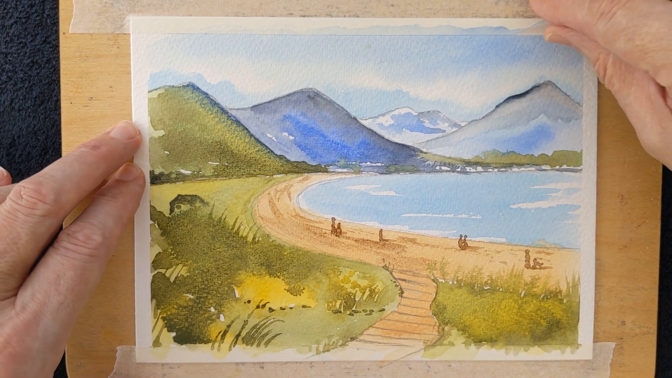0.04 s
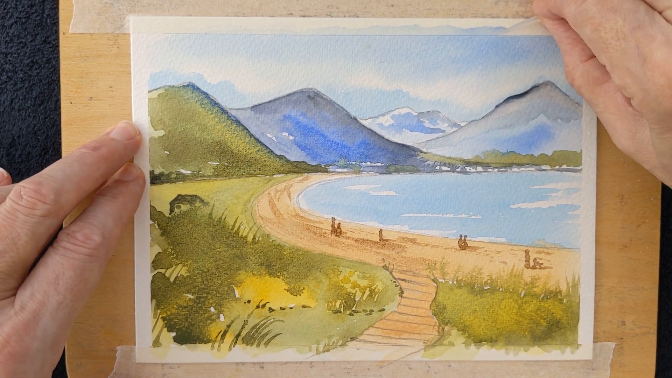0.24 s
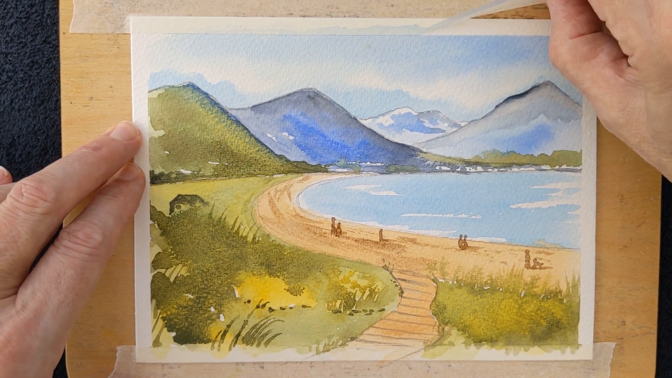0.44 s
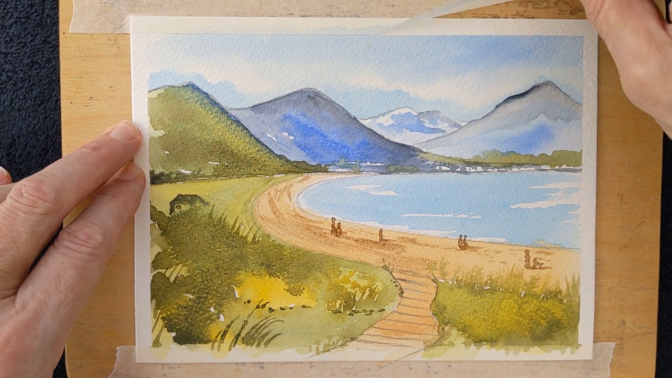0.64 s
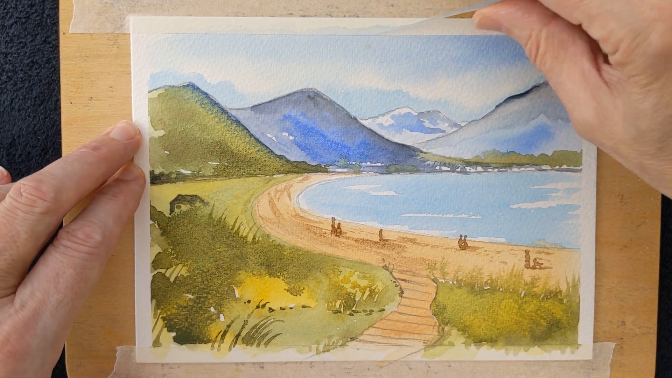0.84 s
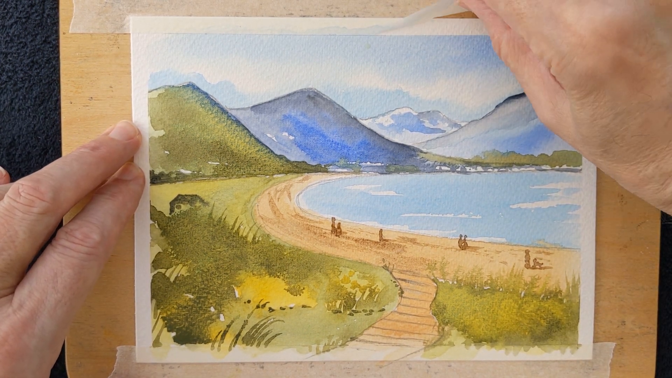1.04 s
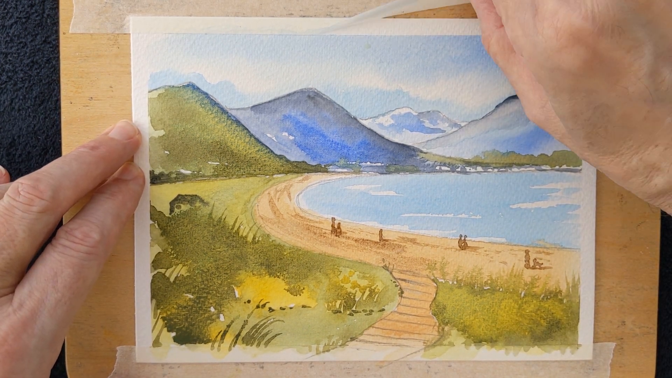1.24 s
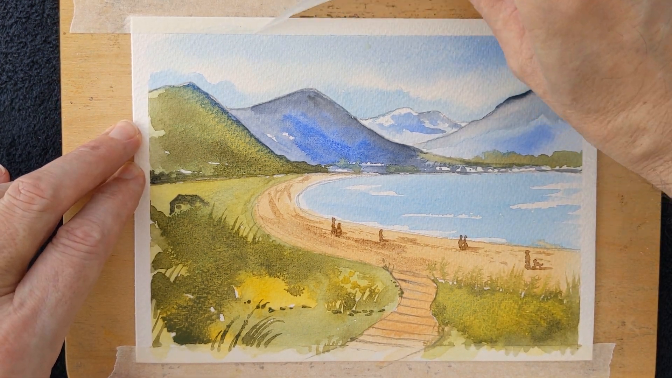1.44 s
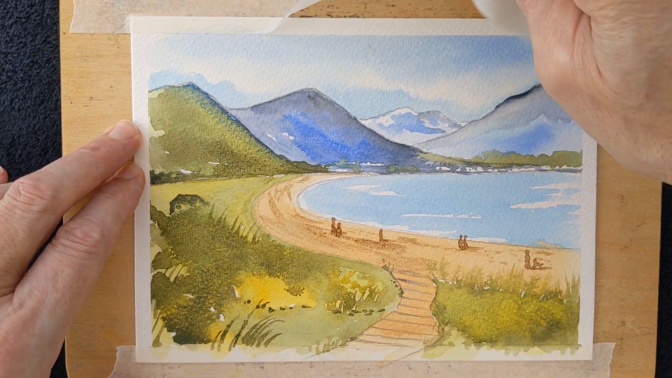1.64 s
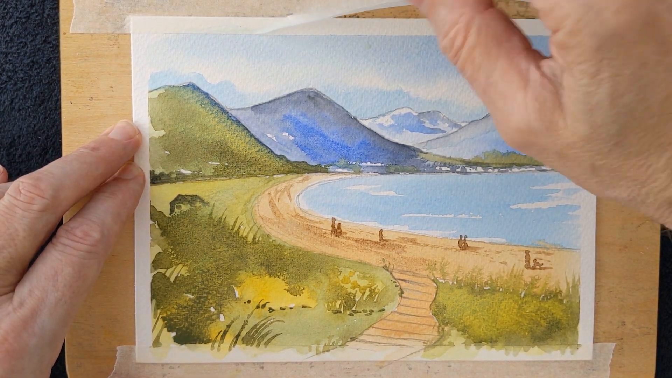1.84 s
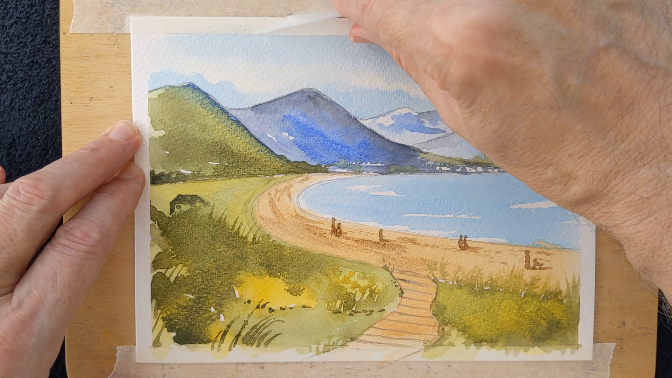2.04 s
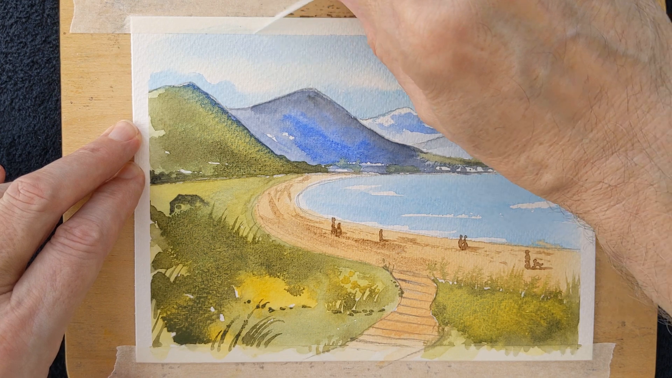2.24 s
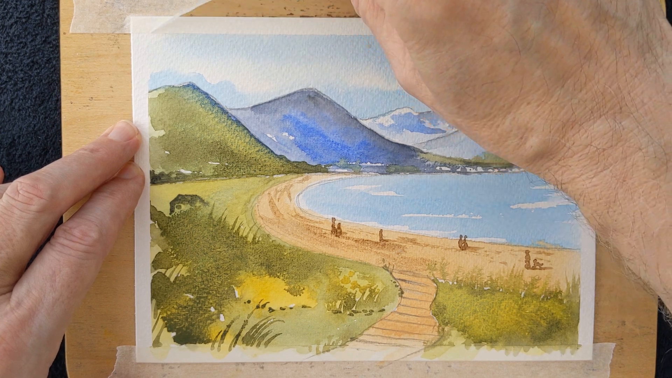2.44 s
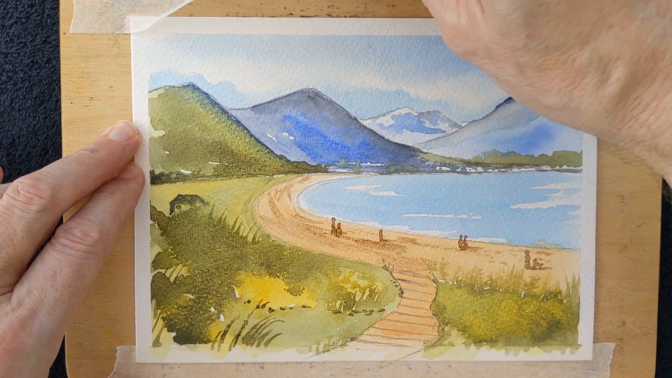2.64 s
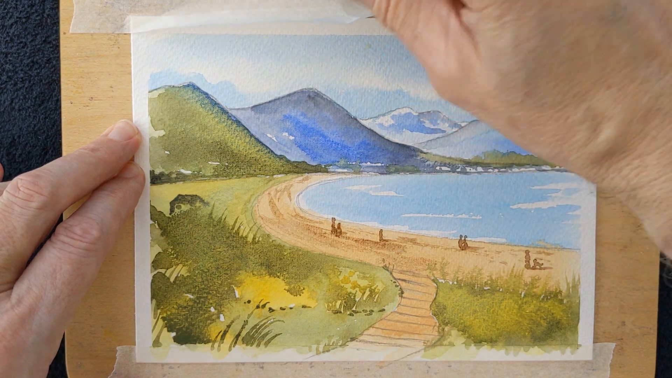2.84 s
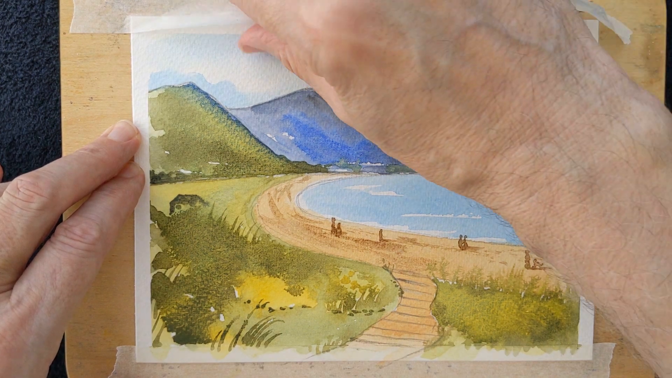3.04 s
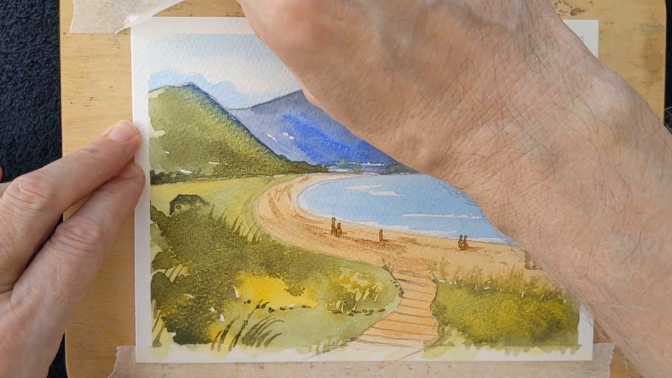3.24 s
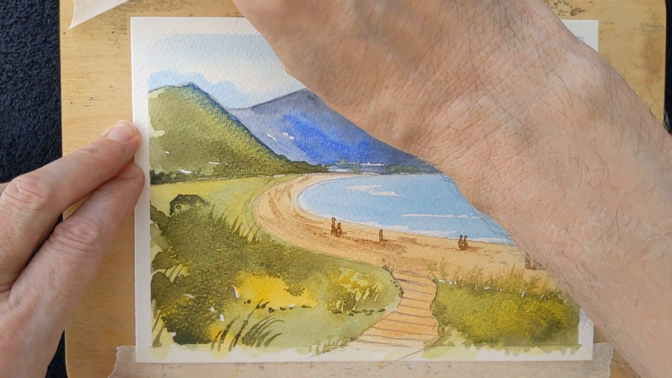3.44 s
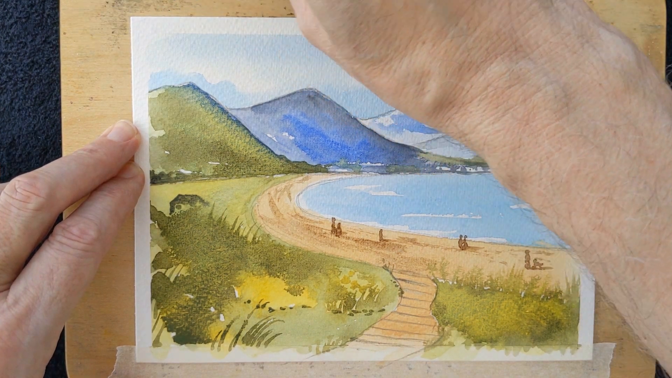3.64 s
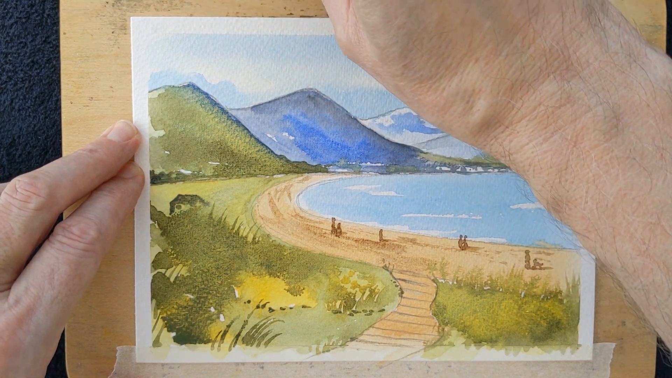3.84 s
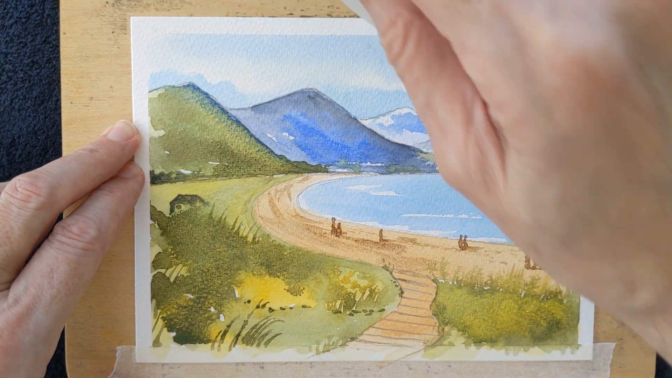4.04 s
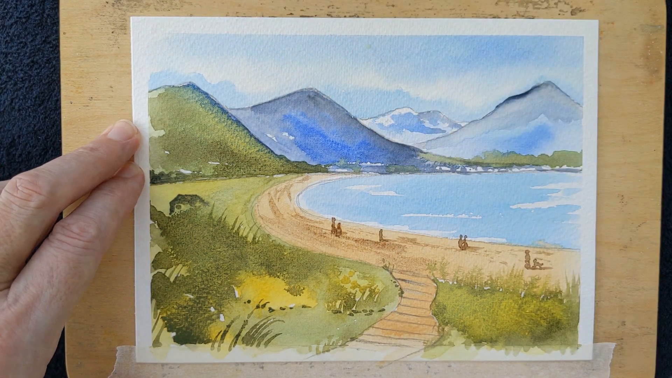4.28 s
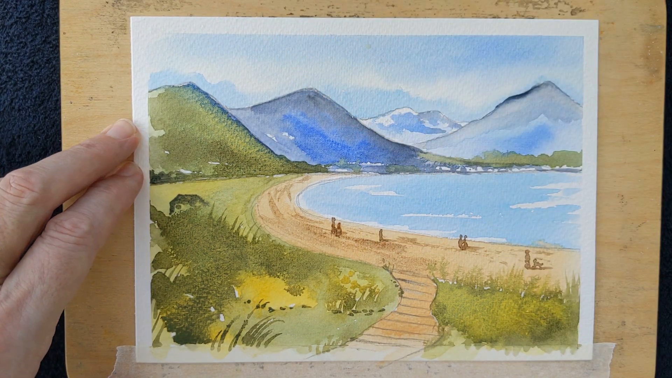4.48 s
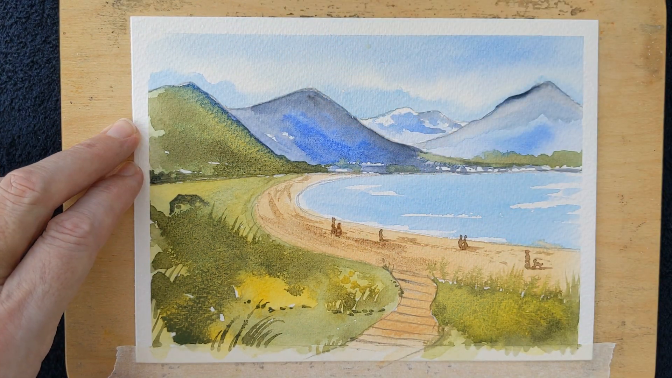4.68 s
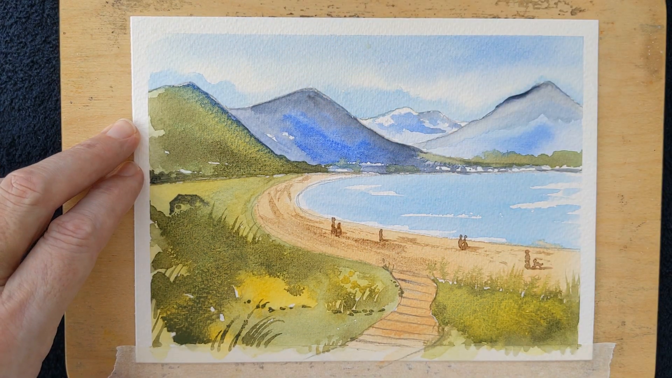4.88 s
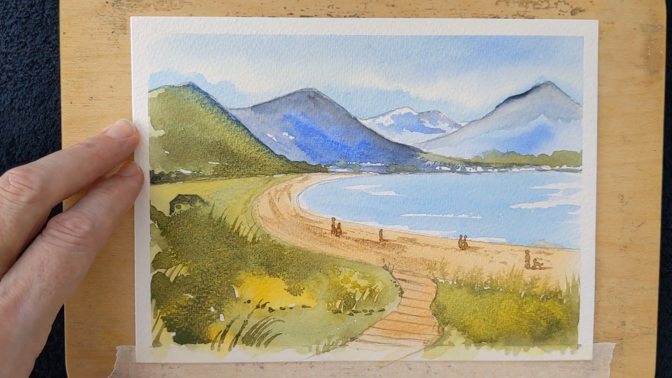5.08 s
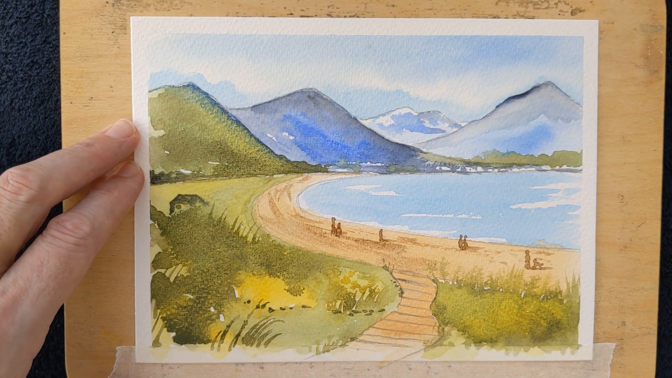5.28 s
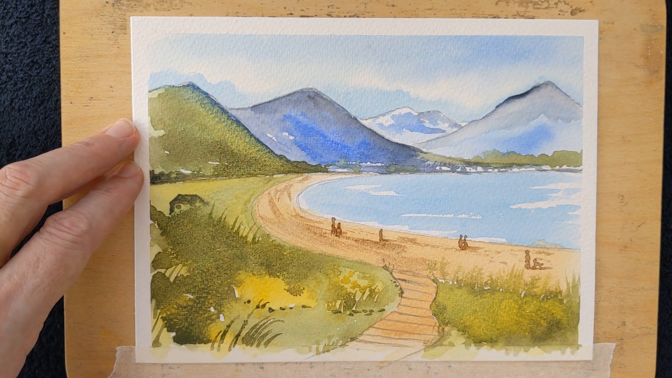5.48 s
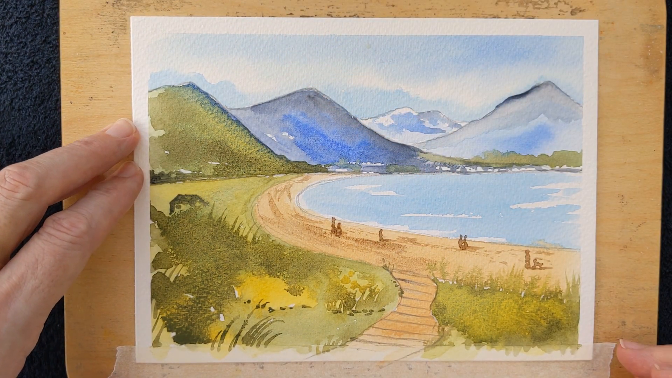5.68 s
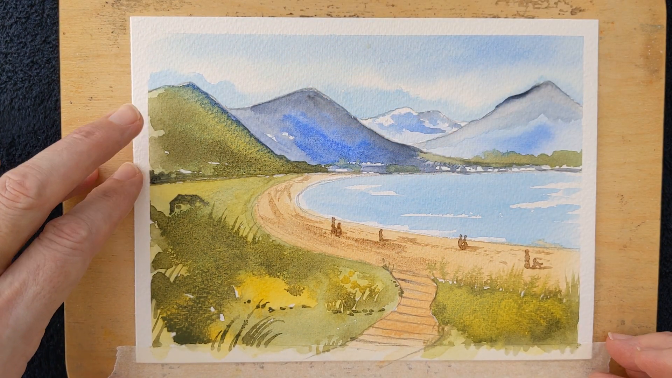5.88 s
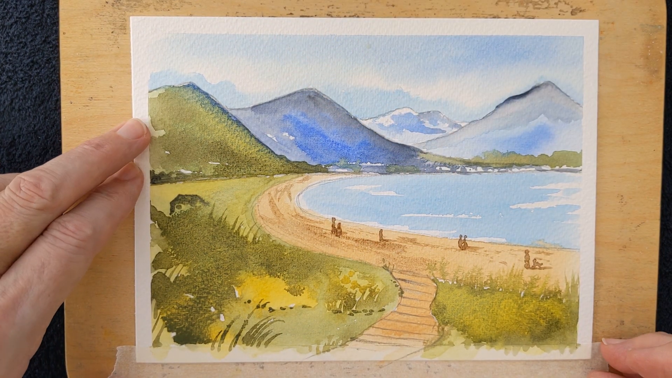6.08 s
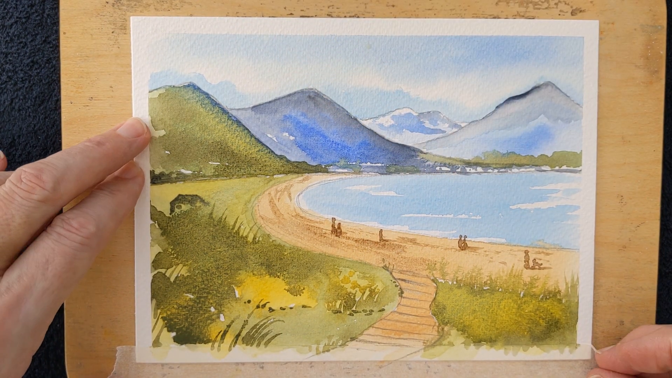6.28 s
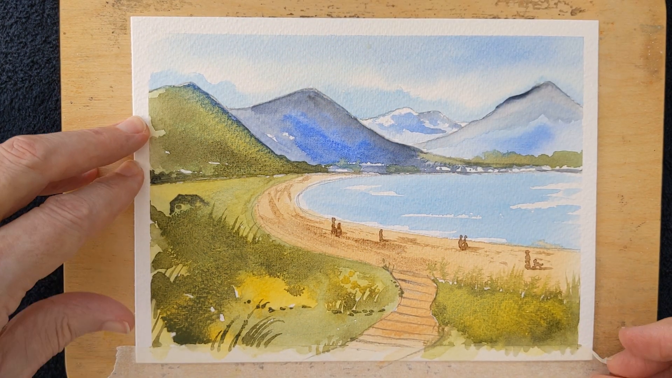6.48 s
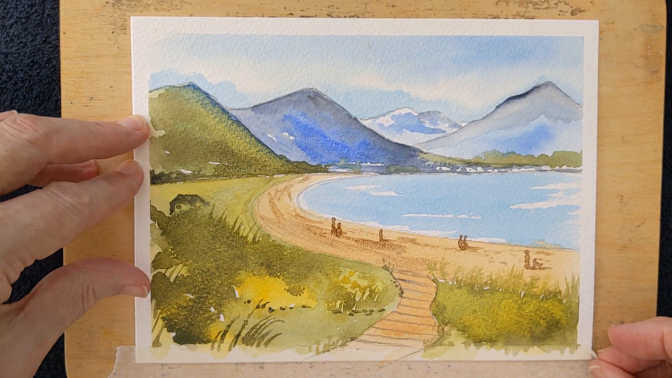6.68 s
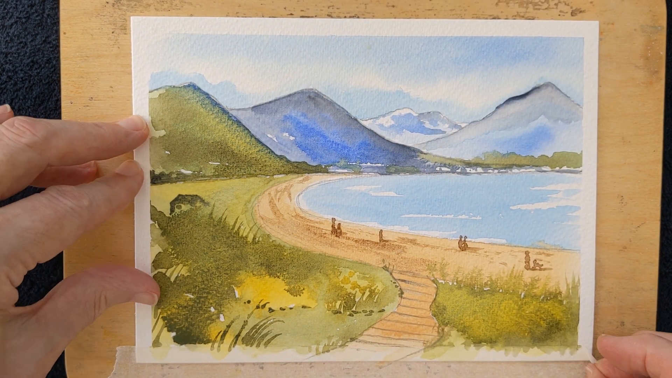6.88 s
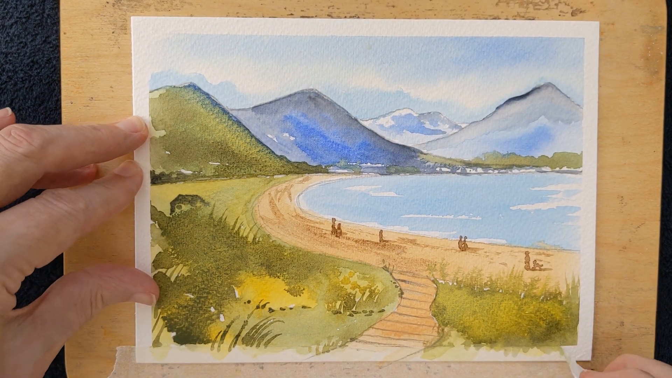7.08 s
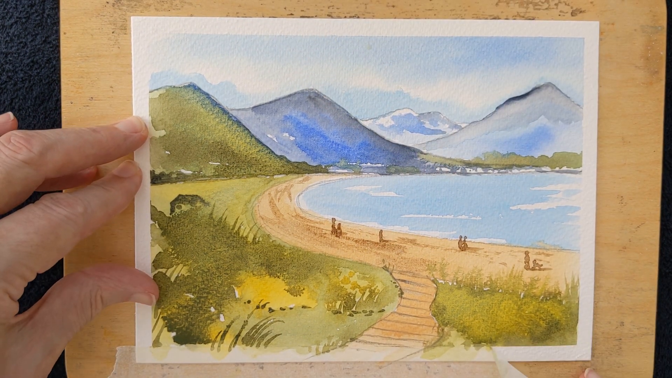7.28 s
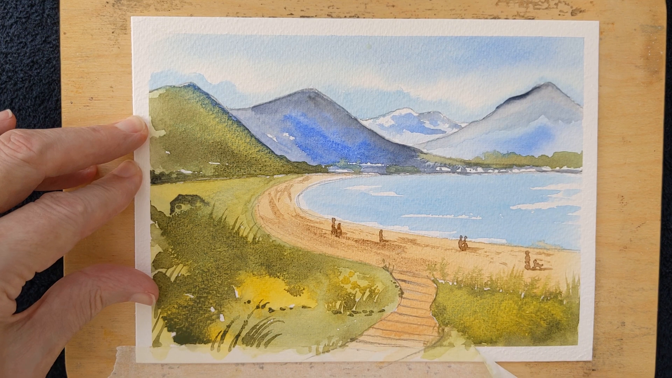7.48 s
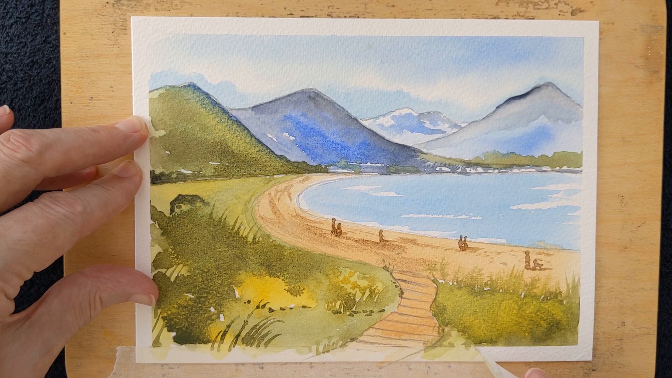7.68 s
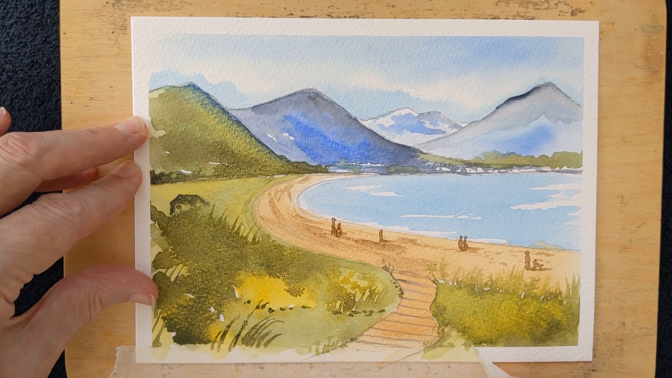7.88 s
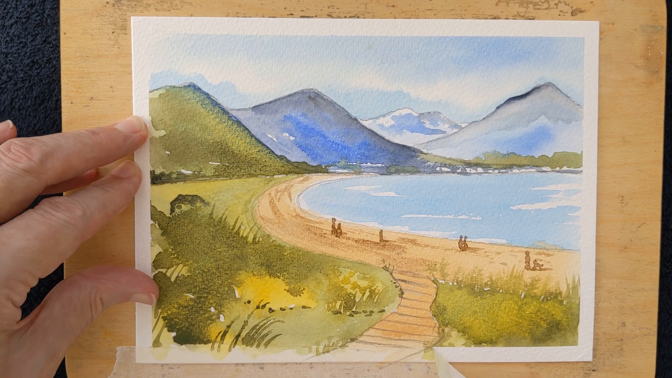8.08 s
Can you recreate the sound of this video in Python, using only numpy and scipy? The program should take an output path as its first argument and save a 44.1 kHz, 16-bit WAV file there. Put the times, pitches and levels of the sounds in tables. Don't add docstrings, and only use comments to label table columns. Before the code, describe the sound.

Indoors, close stereo microphone, with a quiet steady mains hum, soft ventilation and low rumble throughout. Masking tape is peeled from paper on a wooden board. A small creak of glue at 0.25 s leads into a bright crackling rip from 0.3 to 0.55 s, packed with sharp snaps, then a single snap near 0.7. A second strong rip runs from 1.25 to 1.45 s, with a short tick at 1.6. A longer rasp comes at 2.3 to 2.5 s, faint creeping crackle follows, and two quick rips sound at 3.45 and 3.6. The strip drops softly at 4.3 s. Quiet rubs and a tick come around 5.1, then fingertips pick and knock woodily from 5.9 to 6.6, loudest at 6.2. A duller rip follows at 7.1 to 7.35 s, and a last short rip at 8.0 to 8.1. Each rip leaves a brief hard-room ring.

```python
import sys
import numpy as np
from scipy import signal
from scipy.fft import rfft, irfft, next_fast_len
from scipy.io import wavfile
from scipy.ndimage import uniform_filter1d

SR = 44100
rng = np.random.default_rng(int(sys.argv[2]) if len(sys.argv) > 2 else 0)


def output_pcm(signal):
    pcm = np.clip(np.atleast_2d(signal).T, -1, 1) * 32767
    wavfile.write(sys.argv[1], SR, np.round(pcm).astype(np.int16))


def ratio_of_db(decibels):
    return 10 ** (np.asarray(decibels, float) / 20)


N = 358091


def evened(x):
    return x / np.sqrt(np.mean(x ** 2) + 1e-20)


def read(points, hz):
    f, value = np.transpose(points)
    return np.interp(np.log(hz + 1), np.log(f + 1), value)


def add(mix, s, sound):
    part = mix[..., round(s * SR):][..., :sound.shape[-1]]
    part += sound[..., :part.shape[-1]]


def ports(pair, alike):
    size = next_fast_len(pair.shape[1])
    left, other = rfft(pair, size)
    same = np.clip(read(alike, np.fft.rfftfreq(size, 1 / SR)), -.99, .99)
    right = same * left + np.sqrt(1 - same ** 2) * other
    return irfft([left, right], size)[:, :pair.shape[1]]


# (frequency [Hz], density [dB per Hz])
AIR_SPECTRUM = [(120, -47), (200, -15), (245, -12.5), (299, -4), (380, -12.5), (696, -9.5), (1020, -16.5),
                (1680, -18), (1840, -19.5), (4680, -25), (7410, -33), (11900, -27.5), (16000, -34)]
# (frequency [Hz], likeness [-1..1])
AIR_ALIKE = [(130, 0.65), (300, -0.55), (600, -0.22), (3000, 0.)]


def air(level_db=-67.5, patch_db=1.1):
    frames, hz = N // 256 + 5, np.fft.rfftfreq(1024, 1 / SR)
    real, imag, patches = rng.standard_normal((2, frames, 513, 3)).T
    patches = uniform_filter1d(patches, size=12, axis=0)
    patches = evened(uniform_filter1d(patches, size=14, axis=1))
    z = (real + 1j * imag) * ratio_of_db(read(AIR_SPECTRUM, hz)[:, None, None] + patch_db * patches)
    noise = signal.istft(np.moveaxis(z, 2, 0), nperseg=1024, noverlap=768)[1][:, :N]
    return ratio_of_db(level_db) * ports(evened(noise), AIR_ALIKE)


# (frequency [Hz], level [dB])
HUM_LINES = [(301.5, -73), (597.5, -85), (699.8, -84), (748.3, -85.5), (1701, -93.5)]


def hum(gain_db=3.5, waver_db=0.4):
    t = np.arange(N) / SR
    drifts = evened(uniform_filter1d(rng.standard_normal((len(HUM_LINES), N // 441 + 2)), size=12))
    mono = np.zeros(N)
    for (hz, db), drift in zip(HUM_LINES, drifts):
        waver = waver_db * np.interp(t, np.arange(len(drift)) / 100, drift)
        mono += ratio_of_db(db + gain_db + waver) * np.sin(2 * np.pi * hz * t)
    return mono * ratio_of_db(np.array([[-1.5], [1.5]]))


# (time [s], spread [s], rumble rise [dB], thud rise [dB])
PRESSES = [
    (0, .1, 3, 5),
    (.5, 0.24, 10, 14.5),
    (1.35, 0.18, 3, 10),
    (2.4, 0.17, 4, 4),
    (3.55, 0.14, 2, 15.5),
    (4.5, 0.17, 0, -5.5),
    (6.28, .12, 1, 17.5),
    (7.25, 0.18, 3.5, 3),
    (8.1, 0.15, 1, 4.5),
]
# (frequency [Hz], likeness [-1..1])
DIFFUSE_ALIKE = [(30, 0.49), (60, 0.56), (130, 0.9), (300, 1), (700, 0.41), (1400, 0), (4000, 0.065)]


def table(rumble_db=-68, thud_db=-73.5):
    s, spread_s, rumble_rise_db, thud_rise_db = np.transpose(PRESSES)
    press = np.exp(-((np.arange(N)[:, None] / SR - s) / spread_s) ** 2)
    out = np.zeros((2, N))
    for rest_db, rise_db, band_hz in ((rumble_db, rumble_rise_db, [25, 56]),
                                      (thud_db, thud_rise_db, [110, 190])):
        band = signal.butter(2, band_hz, "bandpass", fs=SR, output="sos")
        noise = evened(signal.sosfilt(band, rng.standard_normal((2, N))))
        out += ratio_of_db(rest_db + press @ rise_db) * noise
    return ports(out, DIFFUSE_ALIKE)


def ring(x, hz, width_hz, db):
    b, a = signal.iirpeak(hz, hz / width_hz, SR)
    twice = signal.lfilter(b, a, signal.lfilter(b, a, x))
    return ratio_of_db(db) * twice / np.sqrt(np.pi * width_hz / SR / 2)


# (frequency [Hz], width [Hz], gain [dB])
PARTS = [
    (1770, 2850, -4.8),
    (642, 970, 0.4),
    (5040, 4400, 1),
    (10300, 13800, -1.5),
]
# (frequency [Hz], width [Hz], gain [dB])
DESK = (303, 178, -8)


def shaken(force, apart, hold, narrow=1, spot=(1, 1, 1, 1)):
    sheet_pitch, tape_pitch, width_factor = hold
    pitch = np.array([sheet_pitch, 1, tape_pitch, 1]) * spot
    wide = narrow * np.array([width_factor, 1, width_factor, 1])
    rung = []
    for k, (hz, width_hz, db) in enumerate(PARTS):
        sign = (1, -1, -1, 1)[k]
        push = force[k, 0] + apart * (hz > 1000) * force[k, 1:]
        rung.append(sign * ring(push, hz * pitch[k], width_hz * wide[k], db))
    rung = np.array(rung)
    rung[1] += ring(force[1, 0], *DESK)
    return rung


# (time [s], board [dB], tape [dB], fizz [dB])
GRIPS = [(0, -6.5, 1, -5.5), (1.0, 0, 6, -8), (1.22, -5, -1, -5.5), (1.55, -4.5, -1, -7),
         (2.1, -2, 1.5, -0.5), (2.3, -1.5, 3, 0), (3.05, -1, 9, 6), (3.43, 3, 4, 4), (3.55, 4.5, 8, -1.5),
         (4.1, 6.5, -4, -22), (4.85, -7.5, 4, -6), (5.6, 3, -11, -16), (6.2, 6.5, -5.5, -16.5),
         (6.87, 2.5, 3.5, 7), (7.1, -10, 1.5, 1), (7.8, -15.5, -1.5, -0.5)]
HOLDS = [(0.96, 1.004, 0.77), (1.12, 1.01, 1.02), (0.94, 0.96, 0.72), (0.98, 1.04, 0.83),
         (0.78, 0.94, 1.07), (1.13, 1, 0.76), (1.22, 1.02, 0.86), (0.65, 0.95, 1.06), (1.1, 1.08, 1.2),
         (1.4, 0.66, 1.3), (1.17, 0.95, 0.84), (0.81, 1.1, 0.85), (1.18, 0.88, 0.71), (1.2, 0.87, 0.67),
         (0.71, 1.01, 0.75), (0.91, 1.03, 0.92)]


def part_gains(s, sheet_db, bright_db, tape_share=0.89):
    grip = np.searchsorted([g[0] for g in GRIPS], s, "right") - 1
    _, board_db, tape_db, fizz_db = GRIPS[grip]
    apart_db = np.array([0, board_db, tape_db + tape_share * bright_db, fizz_db + bright_db])
    return ratio_of_db(np.add.outer(apart_db, sheet_db)), HOLDS[grip]


# (time [s], length [s], first level [dB], last level [dB], brightness [dB])
RIPS = [(0.34, 0.047, -43.5, -57, 8.5), (0.393, 0.14, -42.5, -36.5, 0.5), (0.695, 0.013, -39.5, -52, -2.5),
        (1.086, 0.2, -68, -57.5, -2), (1.248, .035, -43, -60, 6.5), (1.288, 0.15, -36, -39.5, 2.5),
        (1.592, 0.09, -52.5, -51.5, 7.5), (2.319, 0.21, -42, -50.5, 2), (3.442, 0.071, -39.5, -55, 1),
        (3.604, 0.044, -45, -54, 3.5), (5.867, 0.02, -61, -79, 9), (5.993, 0.023, -53, -69, -1),
        (6.212, 0.18, -61, -64, 4), (6.923, 0.061, -68.5, -65, 0.5), (7.126, .06, -40, -43, -6),
        (7.195, 0.16, -37.5, -43.5, -2.5), (8.032, 0.067, -40.5, -34.5, 0)]
# (time [s], top [s], end [s], top level [dB], brightness [dB])
CREEPS = [(0.253, 0.325, .34, -46.5, -2.5), (2.124, 2.145, 2.19, -53, -12), (2.18, 2.212, 2.31, -49, 3),
          (2.606, 2.687, 2.78, -52, -1), (3.11, 3.305, 3.4, -57.5, -5), (4.152, 4.284, 4.4, -68, -2),
          (4.915, 5.102, 5.14, -65.5, 4), (5.105, 5.127, 5.22, -49.5, 6.5), (5.69, 5.993, 6.1, -63.5, -1.5),
          (7.016, 7.11, 7.13, -56.5, 2), (7.85, 7.996, 8.04, -54.5, -6)]


def strokes(release_s=0.023, release_db=-43, swell_db=-14.5, fade_db=-22):
    snap_s = np.array([row[0] for row in SNAPS])
    out = []
    for s, length_s, first_db, last_db, bright_db in RIPS:
        start = snap_s[abs(snap_s - s).argmin()]
        times = [start, s + length_s, s + length_s + release_s]
        out.append((times, [first_db, last_db, last_db + release_db], bright_db))
    for s, top_s, end_s, db, bright_db in CREEPS:
        out.append(([s, top_s, end_s], [db + swell_db, db, db + fade_db], bright_db))
    return out


def crackle(per_s=2000, spread_db=2.0, clump_db=1.5, jerk_db=2.0, grain_s=0.00047,
            after_db=3.0, after_s=.015, attack_s=0.00093, db=-9.5, apart=0.68):
    breaks = (rng.random(N) < per_s / SR) * ratio_of_db(spread_db * np.minimum(rng.exponential(1, N), 3))
    clumps = evened(uniform_filter1d(rng.standard_normal(N), size=200))
    jerks = evened(uniform_filter1d(rng.standard_normal(N), size=700))
    breaks = breaks * ratio_of_db(clump_db * clumps + jerk_db * jerks)
    grains = signal.lfilter([1], [1, -np.exp(-1 / (grain_s * SR))], breaks)
    n = np.arange(N)
    snap_at = np.round(np.array([row[0] for row in SNAPS]) * SR).astype(int)
    since = n - np.maximum.accumulate(np.isin(n, snap_at) * n)
    grains = grains * ratio_of_db(after_db * np.exp(-since / SR / after_s))
    threads = evened(grains * rng.standard_normal((3, N)))
    out = np.zeros((2, N))
    for s, levels_db, bright_db in strokes():
        t = n[round(s[0] * SR):round(s[-1] * SR)]
        pull, tension = part_gains(s[0], np.interp(t / SR, s, levels_db), bright_db)
        pull = pull * np.minimum((t - t[0]) / SR / attack_s, 1)
        add(out, s[0], shaken(pull[:, None] * threads[:, t], apart, tension).sum(0))
    return ratio_of_db(db) * out


# (time [s], sheet level [dB], brightness [dB])
GLUE_SNAPS = [(.3022, -40.5, -1), (.3115, -44, -13), (.3438, -34, -2), (.352, -37, -12), (.3624, -42, 8.5),
              (.4021, -31, -1), (.4085, -33, 2), (.4137, -35.5, 7.5), (.4512, -37.5, 5), (.4711, -28, 1),
              (.491, -31.5, -4), (.5143, -36, -1), (.5349, -34.5, 1), (.6961, -40.5, -3),
              (.7224, -47.5, -5), (1.0696, -47, 2), (1.2441, -31.5, -7), (1.2814, -31.5, -5),
              (1.2941, -31.5, -0.5), (1.3095, -29.5, -5), (1.3224, -33, -1), (1.3753, -32.5, -3),
              (1.3929, -34.5, 3.5), (1.4101, -33, -11), (1.4402, -33, 3.5), (1.5891, -41, 6),
              (1.6295, -52.5, 15),
              (2.194, -56, 7), (2.3129, -32.5, -0.5), (2.317, -38.5, 0), (2.3396, -33.5, -13),
              (2.3733, -40, 1), (2.3989, -54, 10), (2.4236, -34.5, -4), (2.4403, -33.5, -4),
              (2.4684, -33, -4), (2.5194, -53, 16), (2.653, -50, 2), (2.6835, -51, -2), (2.6928, -52, 4.5),
              (2.7579, -55.5, -9), (3.2372, -50, -6), (3.2815, -53.5, 2), (3.2878, -47.5, -2),
              (3.348, -61.5, 9.5), (3.447, -34.5, 1), (3.4551, -38.5, -2), (3.4765, -35.5, 2.5),
              (3.4987, -40, -1), (3.6031, -34.5, -18), (3.6095, -36, -5), (3.617, -40.5, 4),
              (4.272, -64, 0), (4.939, -65, -11), (5.1573, -48.5, 5), (5.3788, -62, 0.5),
              (5.8767, -59.5, 11), (6.006, -55, -10), (6.2193, -55.5, 8), (6.2927, -48.5, -18),
              (6.4458, -63, 3), (6.5636, -62, 6), (6.88, -78, 8), (6.934, -74, 13), (6.9813, -70, 11),
              (7.132, -45, 3), (7.1729, -43.5, -3), (7.1934, -38.5, -4.5), (7.2093, -38.5, -5),
              (7.2459, -37, -15), (7.3653, -41, 2.5), (7.8446, -64, -3), (7.9153, -61, -18),
              (8.0218, -58, 9), (8.0333, -47, 10), (8.0383, -40, 4.5), (8.0677, -46, -9),
              (8.0921, -48.5, 12), (8.102, -48, 8), (8.109, -38, -2)]
SNAPS = GLUE_SNAPS
# (board [dB], tape [dB], fizz [dB])
SNAP_COLOUR_DB = (-2.5, -4, -5.5)


def snaps(length_s=0.0027, crack=1.5, crack_s=.0004, narrow=.8, scatter=.07, db=1.0, apart=1.0):
    t, out = np.arange(700) / SR, np.zeros((2, N))
    shape = np.exp(-t / length_s) + crack * np.exp(-t / crack_s)
    colour = ratio_of_db(np.array([0, *SNAP_COLOUR_DB]))
    for s, sheet_db, bright_db in SNAPS:
        ragged = rng.standard_normal((3, 700))
        gains, tension = part_gains(s, sheet_db, bright_db)
        force = np.array([ragged * shape] * len(PARTS))
        spot = np.exp(scatter * ragged[0, -len(PARTS):])
        rung = shaken(force, apart, tension, narrow, spot)
        rung *= np.linalg.norm(shape) / np.linalg.norm(rung, axis=-1, keepdims=True)
        add(out, s, ratio_of_db(db) * np.tensordot(gains * colour, rung, 1))
    return out


# (frequency [Hz], t60 [s])
ROOM_T60 = [(150, .55), (500, .52), (1500, .5), (4000, .44), (8000, .4), (14000, .36)]


def room(x, size=30000, spacing=10, turn_hz=9):
    taps = np.zeros((3, 2, size))
    jitter = rng.integers(0, spacing, (3, 2, (size - 101) // spacing))
    at = np.arange(100, size - 10, spacing) + jitter
    np.put_along_axis(taps, at, rng.choice([-1., 1.], at.shape), 2)
    diffuse = np.array([ports(pair, DIFFUSE_ALIKE) for pair in taps])
    hz, t, z = signal.stft(diffuse, SR, nperseg=256)
    decay = ratio_of_db(-60 * t / read(ROOM_T60, hz)[:, None])
    tails = signal.istft(z * decay, SR, nperseg=256)[1][..., :size]
    tails = tails * np.clip((np.arange(size) / SR - .004) / .007, 0, 1)
    tails /= np.linalg.norm(tails, axis=-1, keepdims=True)
    turn = 2 * np.pi * turn_hz * np.arange(N) / SR
    out = np.zeros((2, N))
    for k, tail in enumerate(tails):
        share = np.sqrt(2 / 3) * np.cos(turn + k * np.pi / 3)
        out += signal.fftconvolve((x * share)[None], tail, axes=1)[:, :N]
    return out


# (time [s], level [dB], frequency [Hz])
DROPS = [
    (4.274, -51, 584),
    (4.299, -50, 255),
    (4.328, -59, 314),
]
# (time [s], level [dB], frequency [Hz])
KNOCKS = [(5.876, -49, 676), (5.994, -47.5, 856), (6.001, -42.5, 876), (6.005, -42, 1040),
          (6.168, -32, 836), (6.172, -34.5, 618), (6.292, -42, 760), (6.326, -41, 630), (6.443, -53, 720),
          (6.564, -45.5, 560), (7.915, -41.5, 573)]


def knocks(t60_s=0.031, attack_s=0.0002):
    t, out = np.arange(2000) / SR, np.zeros(N)
    for s, db, hz in DROPS + KNOCKS:
        attack = 1 - np.exp(-(t / attack_s) ** 2)
        add(out, s, ratio_of_db(db - 60 * t / t60_s) * np.sin(2 * np.pi * hz * t) * attack)
    return out


# (frequency [Hz], gain [dB])
MIC_COLOUR = [(100, 6), (300, -5.5), (3000, 2.5), (6000, -3.5), (7600, -5.5), (9500, 3), (15000, -1)]
# (frequency [Hz], left minus right [dB])
SHADE = [(300, -2), (1300, 2), (4400, -0.5), (8000, -0.5), (15000, -9)]


def scene(snap_wet_db=-4., crackle_wet_db=3.5, right_delay=7):
    fine = crackle()
    sharp = snaps() + knocks()
    near = sharp + fine
    wet = room(ratio_of_db(snap_wet_db) * sharp[0] + ratio_of_db(crackle_wet_db) * fine[0])
    late_right = np.pad(near[1], (right_delay, 0))[:N]
    tape = np.array([near[0], late_right]) + wet
    size = next_fast_len(N + 4096)
    hz = np.fft.rfftfreq(size, 1 / SR)
    response_db = read(MIC_COLOUR, hz) + read(SHADE, hz) * np.array([[.5], [-.5]])
    tape = irfft(rfft(tape, size) * ratio_of_db(response_db), size)[:, :N]
    return tape + air() + hum() + table()


def low_pass(x):
    return signal.sosfilt(signal.butter(12, 16760, fs=SR, output="sos"), x)


def record(dry):
    edge_hz = [0, 15750, 15950, 16650, 16800, SR / 2]
    edge = signal.firwin2(401, edge_hz, [1, 1, .025, .02, 0, 0], fs=SR)
    mix = signal.oaconvolve(dry, edge[None], "same")
    return low_pass(mix)


dry = scene()
out = record(dry)
output_pcm(out)
```